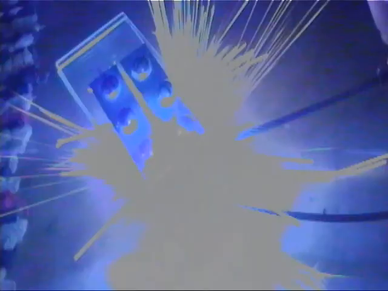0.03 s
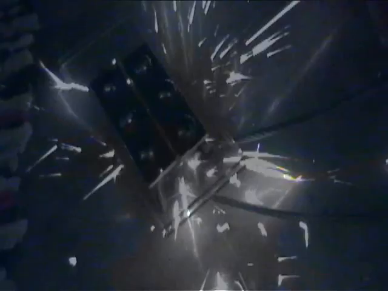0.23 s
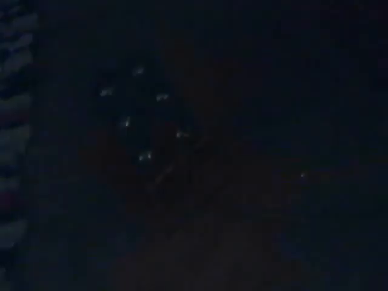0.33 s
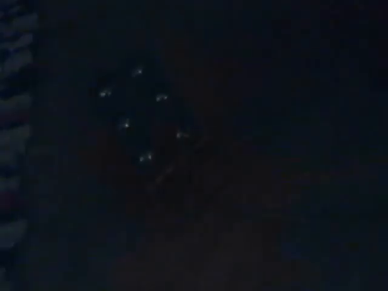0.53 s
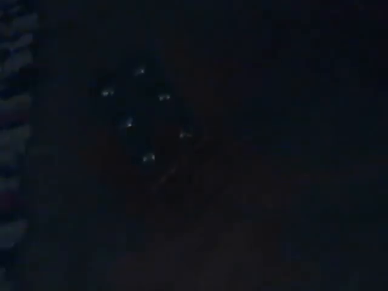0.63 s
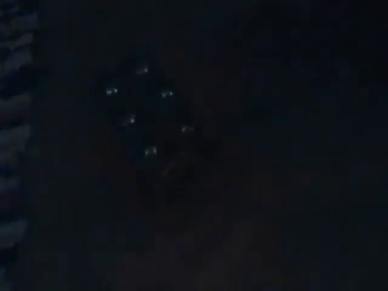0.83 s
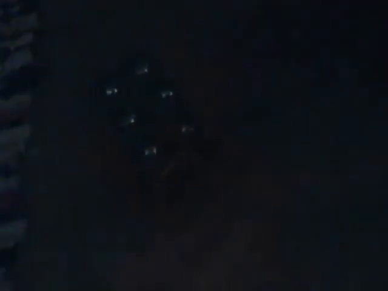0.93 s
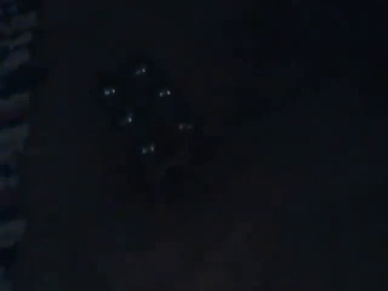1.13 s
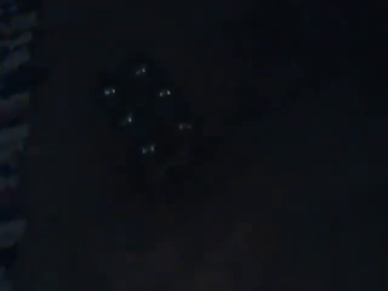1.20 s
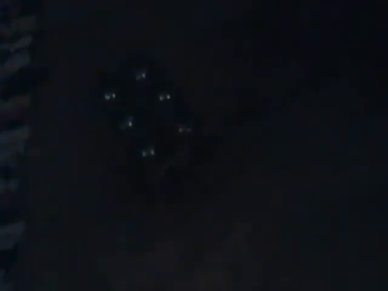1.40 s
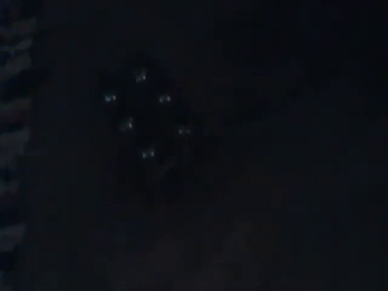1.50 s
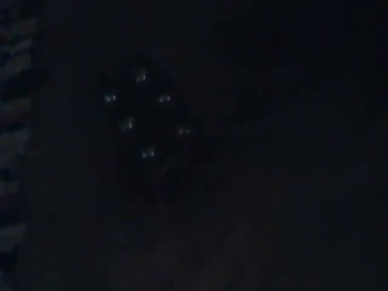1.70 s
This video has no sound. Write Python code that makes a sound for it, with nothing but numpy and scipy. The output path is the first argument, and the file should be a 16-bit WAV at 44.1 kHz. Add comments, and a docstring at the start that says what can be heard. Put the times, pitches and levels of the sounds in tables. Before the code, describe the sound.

A loud electrical bang cracks and echoes through a bare room over a faint hum.

```python
"""A faint hum, a drone and a thin whine hang in a bare room. Then a terminal block shorts with one bang:
the arc cracks, its heated air shoves outward, and the flash-over roars as the drone cuts out.
The walls throw the bang back, narrow tones ring on in its tail, and the echo dies away into the hum.
A cheap camera overloads on the hit, ducks its gain and slowly recovers;
its low sample rate adds a gritty treble throughout."""
import sys
import numpy as np
from scipy import signal
from scipy.fft import rfft, irfft
from scipy.io import wavfile

SR = 44100
rng = np.random.default_rng(int(sys.argv[2]) if len(sys.argv) > 2 else 0)


def put_to_file(sound):
    """Save the sound as 16-bit audio at rate SR, in the file named by the first command-line argument."""
    columns = np.atleast_2d(sound).T  # one column per channel
    safe = np.clip(columns, -1, 1)
    whole_steps = np.round(safe * 32767)
    wavfile.write(sys.argv[1], SR, whole_steps.astype(np.int16))


N = 77175
T = np.arange(N) / SR
HZ = np.fft.rfftfreq(N, 1 / SR)
ARC_S, PUSH_S, GUST_S, FLASH_S = .2273, .2298, .2312, .2338  # four cues so close they land as one hit

# The bright snap of the strike. Each row: frequency in Hz, relative level in dB.
CRACK_EQ = [(60, -16.5), (600, -7.5), (1500, -4), (2500, 4), (3300, -5), (4000, -10)]
# The ragged, mid-heavy roar. Each row: frequency in Hz, relative level in dB.
ROAR_EQ = [(60, -21), (130, -12.5), (190, -15.5), (260, -2.5), (400, -15.5), (520, -0.5), (650, -5.5),
           (820, -7), (1050, 0), (1400, -2.5), (1630, -0.5), (1920, -15), (2550, 2.5), (3200, -10),
           (3900, -18)]
# Where the roar and its reverb lean. Each row: frequency in Hz, left minus right in dB.
ROAR_PAN = [(60, 5), (200, -3.5), (700, -4), (1200, -4), (2000, 3), (3300, -5)]
# The tight stereo image of the direct sound. Each row: frequency in Hz, left-right likeness (1 is mono).
DIRECT_IMAGE = [(60, .93), (300, .6), (1200, .85), (4000, .8)]
def arc():
    """A short bright crack as the arc strikes, then the roar of the flash-over."""
    hold_s, crack_t60_s = .0032, .018
    snap = (T > ARC_S) * amp(-60 * np.maximum(T - ARC_S - hold_s, 0) / crack_t60_s)
    crack = amp(18) * noise(CRACK_EQ, image=DIRECT_IMAGE) * snap
    roar = amp(28) * noise(ROAR_EQ, left_db=read(ROAR_PAN), image=DIRECT_IMAGE)
    return crack + roar * burst(FLASH_S, rise_s=.004, t60_s=.2)


# The low weight under the hit. Each row: frequency in Hz, relative level in dB.
BOOM_EQ = [(15, -24.5), (35, -7.5), (58, 3), (90, -3.5), (140, -10), (250, -14), (500, -33.5), (4000, -67)]
def air_blast():
    """Heated air: a push and suction, a gust that meets the two mic ports in opposite senses, a boom."""
    push_length_s, gust_length_s = .0027, .0043
    age = np.maximum(T - PUSH_S, 0) / push_length_s  # the push turns to suction at 1
    push = -amp(21) * (age > 0) * (1 - age) * np.exp(-age) * amp([[0], [-5.5]])
    swing = np.sin(2 * np.pi * np.clip((T - GUST_S) / gust_length_s, 0, 1))
    gust = amp(20) * swing * np.array([[-1], [1]])
    boom = amp(14) * noise(BOOM_EQ, left_db=6, image=DIRECT_IMAGE)
    return push + gust + boom * burst(PUSH_S, rise_s=.003, t60_s=.29)


# The pitched ring-out. Each row: pitch in Hz, relative level in dB, seconds to fall 60 dB.
RING_TONES = [(539.2, 6.5, .3), (1051, 5.5, .85), (1192, 5.5, .85), (1220, 5, .85), (1603, 10, 0.46),
              (1774, 11.5, .3), (2415, 12.5, .55), (2452, 11, 0.76), (2834, 8.5, .5), (3220, 4, 0.24)]
def ringing_tones():
    """Narrow tones ring on after the bang and colour its tail, left and right a little out of step."""
    rings = 0
    for hz, db, t60_s in RING_TONES:
        phase = 2 * np.pi * rng.random() + .54 * rng.standard_normal((2, 1))
        tone = amp(db) * np.sin(2 * np.pi * hz * T + phase)
        rings = rings + tone * burst(FLASH_S, rise_s=.004, t60_s=t60_s)
    return rings


# Hard slaps off the walls. Each row: start in seconds, relative level in dB.
WALL_SLAPS = [(.2545, 19), (.2655, 16.5), (0.2766, 14), (0.281, 16), (0.33, -0.5)]
# The colour of the dense reverb. Each row: frequency in Hz, relative level in dB.
REVERB_EQ = [(35, -53), (60, -14.5), (127, -26), (222, -8), (265, -14.5), (327, -9.5), (363, -9),
             (514, -8.5), (581, -10.5), (634, -7), (853, -12), (1050, -4), (1210, -2.5), (1320, -7.5),
             (1840, -9), (2660, -5.5), (3900, -20.5), (5070, -58.5), (8580, -120)]
# How long the reverb hangs. Each row: band centre in Hz, seconds to fall 60 dB.
REVERB_DECAY = [(60, .6), (200, .85), (500, 0.79), (1200, 0.79), (2500, 0.92), (3900, 0.81)]
# The soft afterglow. Each row: frequency in Hz, relative level in dB.
AFTERGLOW_EQ = [(35, -17), (90, -20), (170, -12), (220, -2), (280, -10.5), (400, -7.5), (800, -8.5),
                (1050, -2), (1230, 0.5), (1500, -5), (1900, -5.5), (2550, -6.5), (3300, -18), (4000, -25.5)]
def room_echo():
    """The walls return a few slaps, a dense tail whose bands die at their own speeds, and an afterglow."""
    slaps = noise(ROAR_EQ) * sum(amp(db) * burst(s, rise_s=.0005, t60_s=.043) for s, db in WALL_SLAPS)
    wash = rfft(noise(REVERB_EQ, left_db=read(ROAR_PAN)))
    tail, bloom_s = 0, .0057
    for hz, t60_s in REVERB_DECAY:
        band = read([(centre, float(centre == hz)) for centre, _ in REVERB_DECAY])
        tail = tail + irfft(wash * band, N) * burst(FLASH_S, bloom_s, t60_s)
    afterglow = amp(3.5) * noise(AFTERGLOW_EQ) * burst(FLASH_S, bloom_s, t60_s=1.34)
    return slaps + amp(16) * tail + afterglow


# Mains hum and the tones of running equipment. Each row: pitch in Hz, relative level in dB.
HUM_TONES = [(120, -64.5), (144, -59), (198, -56)]
# A narrow, low-mid drone. Each row: frequency in Hz, relative level in dB.
DRONE_EQ = [(100, -42), (280, -22.5), (322, 1), (365, -1.5), (410, -9.5), (500, -30.5), (1000, -51)]
# The dull bed of room tone. Each row: frequency in Hz, relative level in dB.
ROOM_TONE_EQ = [(20, -24), (60, -14), (110, -6), (170, -2), (215, -2), (270, -11.5), (450, -13.5),
                (700, -13.5), (1100, -16.5), (1900, -16), (2800, -19), (3800, -25.5)]
def background():
    """Room tone, wavering equipment hum, an electronic whine, and a drone that stops with the short."""
    hum = 0
    for hz, db in HUM_TONES:
        waver = unit_rms(irfft(rfft(rng.standard_normal(N)) * np.exp(-HZ / 8), N))
        hum = hum + amp(db) * (1 + .16 * waver) * np.sin(2 * np.pi * (hz * T + rng.random()))
    whine = amp(-57) * np.sin(2 * np.pi * 3934 * T) * amp([[0], [-4.5]])  # leans left
    drone = amp(-52) * noise(DRONE_EQ) * (T < FLASH_S)
    bed = amp(-48) * noise(ROOM_TONE_EQ) + drone + np.sqrt(2) * hum
    return bed * amp([[-3.5], [0]]) + np.sqrt(2) * whine


# The wider stereo image of the room. Each row: frequency in Hz, left-right likeness (1 is mono).
ROOM_IMAGE = [(60, 0.49), (130, 0.77), (250, 0.12), (700, 0.56), (1200, .8), (2400, 0.32), (3500, 0.24)]
def noise(eq, left_db=0, image=ROOM_IMAGE):
    """Stereo noise at rms 1, with its colour, pan and width set across frequency."""
    a, b = rfft(rng.standard_normal((2, N)))
    likeness = np.clip(read(image), -1, 1)
    mid, side = a * np.sqrt(1 + likeness), b * np.sqrt(1 - likeness)
    pair = np.array([(mid + side) * amp(left_db / 2), (mid - side) * amp(-left_db / 2)])
    return unit_rms(irfft(pair * amp(read(eq)), N))


def burst(start_s, rise_s, t60_s):
    """Envelope: a straight attack, then a fall of 60 dB every t60_s."""
    age = np.maximum(T - start_s, 0)
    return np.minimum(age / rise_s, 1) * amp(-60 * np.maximum(age - rise_s, 0) / t60_s)


def amp(db):
    """Decibels to gain."""
    return 10 ** (np.asarray(db) / 20)


def unit_rms(x):
    """Scales to rms 1."""
    return x / np.sqrt(np.mean(x ** 2) + 1e-20)


def read(points):
    """Joins (Hz, value) points into a curve on a log-frequency axis."""
    hz, value = np.transpose(points)
    return np.interp(np.log(HZ + 1), np.log(hz + 1), value)


def lowpass(x, edge_hz):
    """Steep treble cut."""
    taps = signal.firwin(1023, edge_hz, window=("kaiser", 8), fs=SR)
    return signal.oaconvolve(x, taps[None], "same")


def smooth(x, seconds):
    """One-pole lag."""
    pole = np.exp(-1 / (seconds * SR))
    return signal.lfilter([1 - pole], [1, -pole], x)


def scene():
    """The bang and its echo over the background."""
    bang = arc() + air_blast() + ringing_tones() + room_echo()
    return amp(-2.5) * bang + background()


def record(dry):
    """The camera ducks, saturates and narrows the sound; held samples mirror it into gritty treble."""
    threshold_db, recovery_db_per_s = -5.5, 11.5
    preamp_ceiling, bass_cut_hz, hold_samples = .93, 20, 4
    power_db = 10 * np.log10(smooth((dry ** 2).mean(0), seconds=.015) + 1e-12)
    recovery_db = recovery_db_per_s * T
    peak_db = np.maximum.accumulate(power_db + recovery_db) - recovery_db  # jumps up, sinks slowly
    duck_db = smooth(np.maximum(peak_db - threshold_db, 0), seconds=.0046)
    squashed = preamp_ceiling * np.tanh(dry * amp(-duck_db) / preamp_ceiling)
    squashed = squashed - smooth(squashed, 1 / (2 * np.pi * bass_cut_hz))
    narrow = np.clip(lowpass(squashed, edge_hz=4060), -1, 1)
    held = np.repeat(narrow[:, ::hold_samples], hold_samples, axis=1)[:, :N]
    return lowpass(held, edge_hz=15127)


dry = scene()
out = record(dry)
put_to_file(out)
```